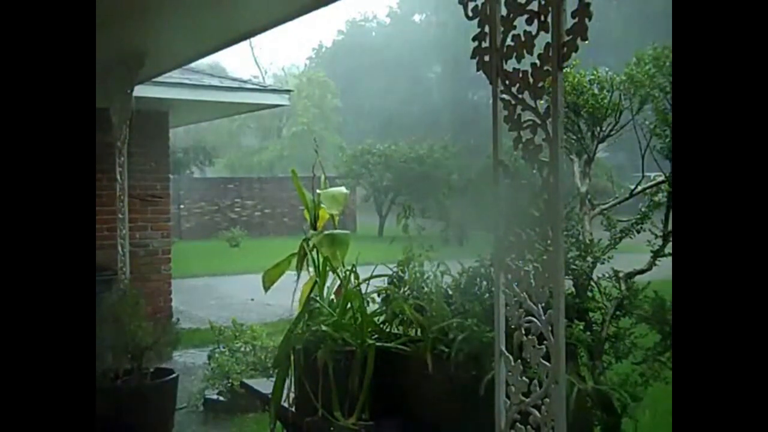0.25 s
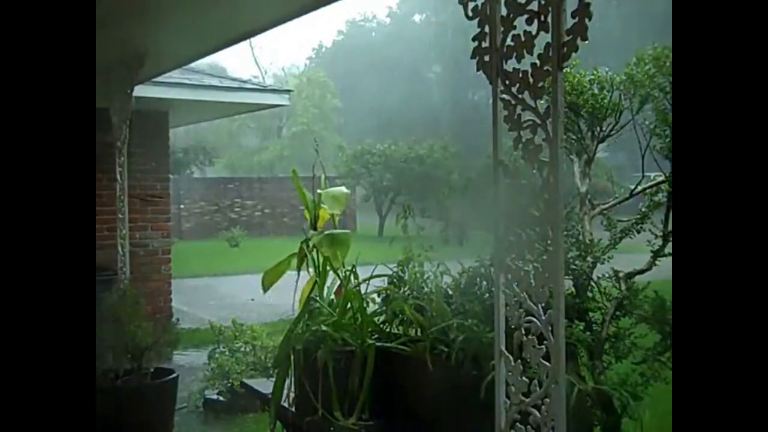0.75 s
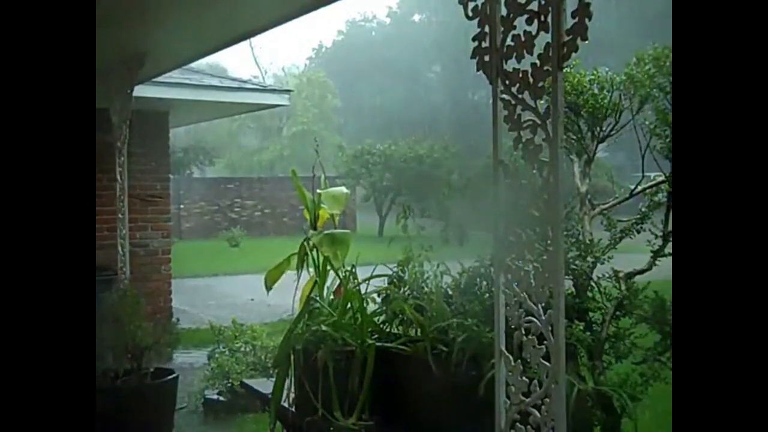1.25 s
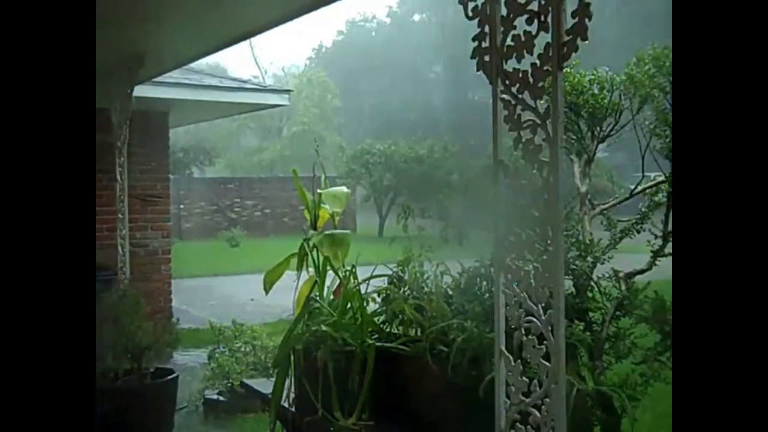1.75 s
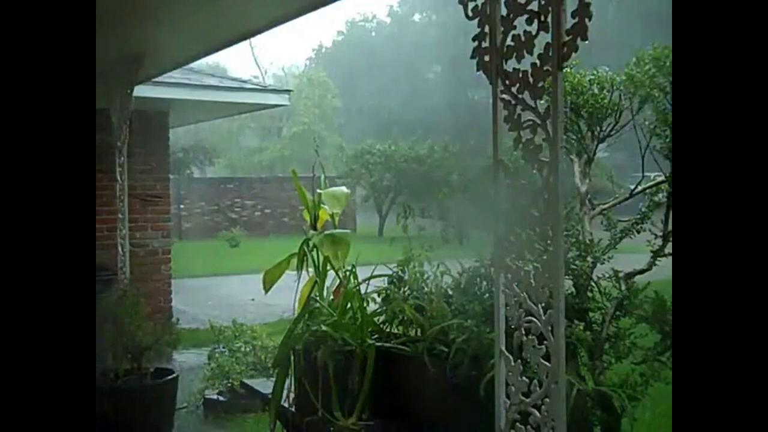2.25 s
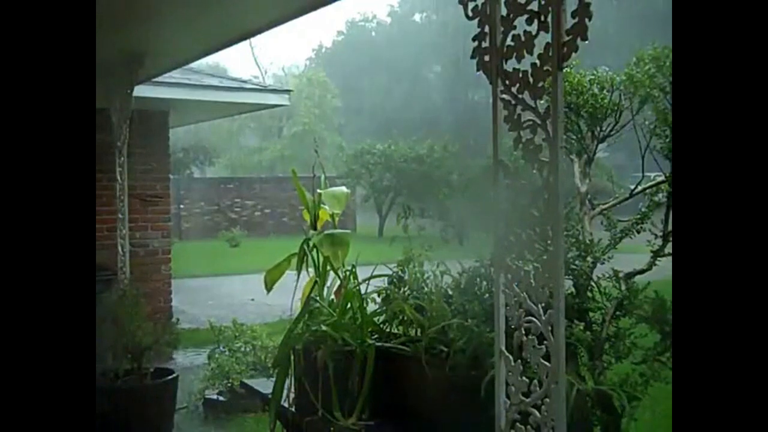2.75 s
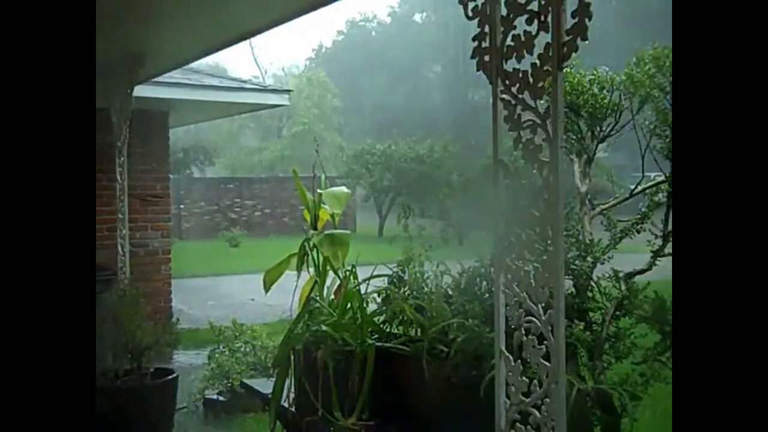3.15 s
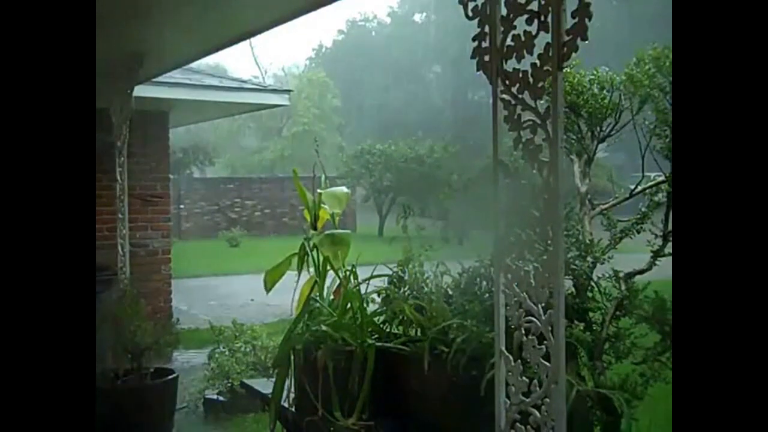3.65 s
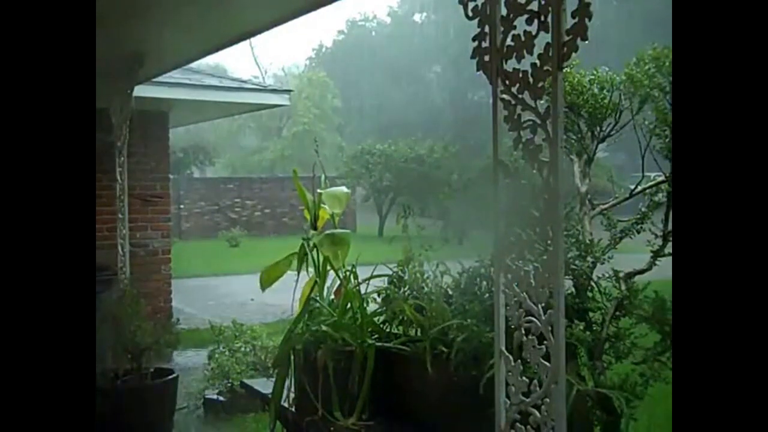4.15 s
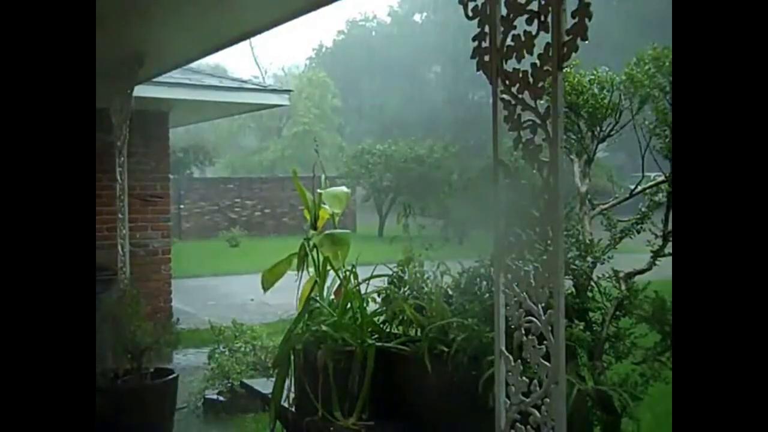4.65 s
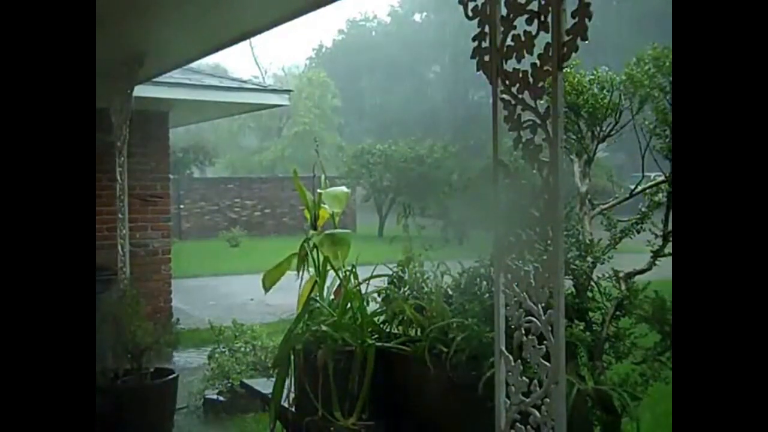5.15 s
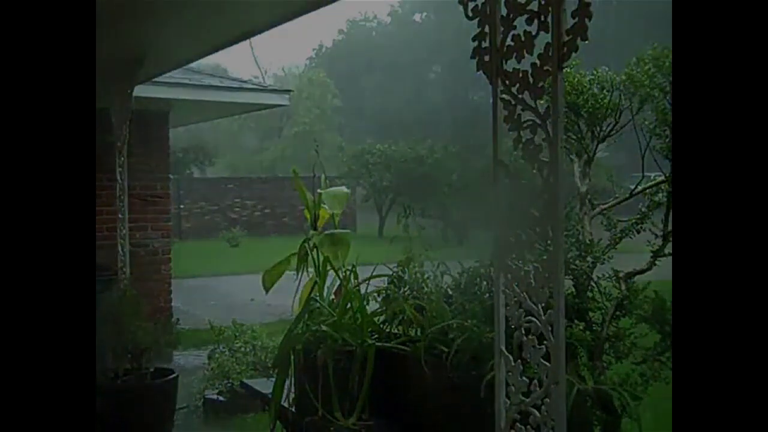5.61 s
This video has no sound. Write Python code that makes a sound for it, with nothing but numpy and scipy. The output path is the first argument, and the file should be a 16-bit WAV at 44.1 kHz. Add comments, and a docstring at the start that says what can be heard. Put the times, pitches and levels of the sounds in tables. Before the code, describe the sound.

Dense hissing downpour with crisp pattering drops and occasional fat splats near a sheltered porch, while faraway low thunder swells and fades.

```python
"""Heavy rain on a garden, heard from under a porch roof: far drops merge into a wash of drifting noise,
nearer ones patter as random clicks, fat drips crack and spray, and leaves, pots and bubbles ring as decaying sines.
Far thunder rolls through twice behind it: dulled pulse trains under swelling envelopes, with short low thuds.
The two microphone ports each ring at their own pitch in the treble, which gives the rain its sizzle."""
import sys
import numpy as np
from scipy import signal
from scipy.io import wavfile
from scipy.ndimage import uniform_filter1d

SR = 44100
rng = np.random.default_rng(int(sys.argv[2]) if len(sys.argv) > 2 else 0)


def wrap_up_sound(samples):
    """Save the sound to the file named by the first command line argument, as 16-bit audio."""
    columns = np.atleast_2d(samples).T
    # keep every value between -1 and 1, then stretch to whole-number steps
    tamed = np.clip(columns, -1, 1)
    steps = np.round(tamed * 32767).astype(np.int16)
    wavfile.write(sys.argv[1], SR, steps)


N = 259299
TIME = np.arange(N) / SR  # seconds


def gain_of(db):
    """Decibels to an amplitude factor: 20 dB is a factor of ten."""
    return 10 ** (np.asarray(db) / 20)


def evened(x):
    """Normalization: scales a signal to rms 1."""
    return x / np.sqrt(np.mean(x ** 2) + 1e-20)


def read(points, hz):
    """Interpolates a table along a logarithmic frequency axis."""
    f, value = np.transpose(points)
    return np.interp(np.log(hz + 1), np.log(f + 1), value)


def add(mix, s, sound):
    """Superposition: adds a stereo sound to the mix in place, from time s."""
    start = max(round(s * SR), 0)
    part = mix[:, start:][:, :sound.shape[1]]
    part += sound[:, :part.shape[1]]


def colour(x, points, size=8192):
    """Minimum-phase filtering: the spectrum alone fixes a causal response, which rings only after a click."""
    hz = abs(np.fft.fftfreq(size, 1 / SR))
    log_gain = np.log(gain_of(read(points, hz)))
    # the Hilbert transform of the log gain supplies the phase
    response = np.exp(np.conj(signal.hilbert(log_gain)))
    taps = np.fft.ifft(response).real[:size // 2]
    return signal.oaconvolve(x, taps[None], axes=1)[:, :N]


def pair(a, b, likeness):
    """Partial coherence: two channels of the given correlation from two unrelated signals."""
    c = np.clip(likeness, -1, 1)
    return np.array([a, c * a + np.sqrt(1 - c ** 2) * b])


def drift(t, slow_hz, fast_hz, count=30):
    """Random modulation of rms 1: sines of random phase, the slower ones larger."""
    total = 0
    for f in np.geomspace(slow_hz, fast_hz, count):
        total = total + np.sin(2 * np.pi * (f * t + rng.random())) / np.sqrt(f)
    return evened(total)


def impacts(per_s, spread_db):
    """Shot noise: clicks at random times and of random sign, most small and a few large."""
    size = gain_of(spread_db * np.minimum(rng.exponential(1, N), 4))
    return size * rng.choice([-1, 1], N) * (rng.random(N) < per_s / SR)


def porch(x, wet_db, t60):
    """Reverberation: floor, wall and roof answer with reflections that fall 60 dB in t60 seconds."""
    t = TIME[:SR // 4]
    tail = rng.standard_normal((2, len(t))) * gain_of(-60 * t / t60)
    tail *= t > .002  # the first reflection takes 2 ms
    tail /= np.linalg.norm(tail, axis=1, keepdims=True)
    return x + gain_of(wet_db) * signal.oaconvolve(x, tail, axes=1)[:, :N]


def peal(start, hold):
    """Power envelope of one peal: exponential swell, hold, quick fall and a lingering echo."""
    rise_s, fall_s = 0.11, .11
    echo_db, echo_fall_s = -5, 0.75  # the land throws each peal back as a long, fading grumble
    early = np.maximum(start - TIME, 0)
    late = np.maximum(TIME - start - hold, 0)
    direct = np.exp(-late / fall_s)
    echo = gain_of(echo_db) * np.exp(-late / echo_fall_s)
    return (np.exp(-early / rise_s) * np.maximum(direct, echo)) ** 2


def paths(db, share, deep_db):
    """Power division: splits a level between dull and bright paths, and adds a deep part."""
    share = np.clip(share, 0, 1)
    return gain_of(db) ** 2 * np.array([[1 - share], [share], [gain_of(deep_db) ** 2]])


def rumble(power, spectrum, likeness):
    """Scattering and absorption: dense pressure pulses, dulled by distance, follow a power envelope."""
    pulses = pair(impacts(900, spread_db=2.0), impacts(900, spread_db=1.5), likeness)
    sound = colour(pulses, spectrum)
    local_power = uniform_filter1d((sound ** 2).mean(0), size=4000)
    return sound * np.sqrt(power / (local_power + 1e-12))


def thunder():
    """Incoherent addition: the powers of overlapping peals sum to a roll with dull, bright and deep parts."""
    # The peals of far thunder. Each row: start of the hold in seconds, hold in seconds, level in dB,
    # share of the power on the open, brighter path (0-1), deep end in dB relative to the level.
    peal_rows = [(1.26, 0.25, -42.5, 0.49, -14.5), (1.8, .38, -46.5, .55, -7),
                 (2.45, .24, -43.5, 0.082, -8), (2.82, .23, -43, .7, -11.5), (5.19, 0.14, -54, 0.39, -8.5)]
    # The low grumble that never quite stops: level in dB, brighter share (0-1), deep end in dB relative to it.
    grumble = (-58.5, 0.3, -6.5)
    # Spectra of the three parts. Each row: frequency in Hz, relative spectral level in dB.
    dull_spectrum = [(60, -25), (100, -3.5), (135, -1.5), (180, 3.5), (225, 0), (290, -15.5), (400, -13.5),
                     (800, -33), (1600, -54)]
    bright_spectrum = [(60, -28.5), (110, -7.5), (175, -1), (260, 1.5), (298, -5), (355, 2.5), (430, -7),
                       (500, -12.5), (800, -19.5), (1600, -41.5)]
    deep_spectrum = [(18, -31), (35, -18.5), (55, -5.5), (70, 2.5), (85, 0), (105, 1), (140, -8.5),
                     (300, -49)]
    power = paths(*grumble)
    for start, hold, *tone in peal_rows:
        power = power + paths(*tone) * peal(start, hold)
    dull, bright, deep = power
    return (rumble(dull, dull_spectrum, likeness=1.0)
            + rumble(bright, bright_spectrum, likeness=0.97)
            + rumble(deep, deep_spectrum, likeness=.85))


def thuds():
    """Wave packets: single shocks stand out of the roll as low sines under Gaussian envelopes."""
    # The dull thuds of the thunder. Each row: time of the peak in seconds, envelope peak in dB, pitch in Hz.
    thud_rows = [(0.095, -41.5, 198), (1.275, -38.5, 177), (1.44, -40.5, 195), (2.454, -41.5, 67),
                 (2.49, -39.5, 138), (2.595, -35, 63), (2.635, -35.5, 145), (2.823, -40, 117.6),
                 (2.955, -43.5, 88), (4.24, -42, 250), (5.021, -42, 273), (5.20, -46, 192)]
    width_s = 0.021  # from the peak to 1/e
    out = np.zeros(N)
    for at, db, hz in thud_rows:
        t = TIME - at
        envelope = gain_of(db) * np.exp(-(t / width_s) ** 2)
        out += envelope * np.sin(2 * np.pi * (hz * t + rng.random()))
    return out


def bubbles(level_db=-56, per_s=150, low_hz=1500, high_hz=7000, cycles=22, spread_db=3):
    """Damped resonance: drops in puddles trap small bubbles, each ringing briefly at its own pitch."""
    out, t = np.zeros((2, N)), TIME[:SR // 16]
    for when, pitch, size, side in rng.random((int(per_s * N / SR), 4)):
        hz = low_hz * (high_hz / low_hz) ** pitch
        loudness = gain_of(-spread_db * np.log(size + .02))  # a few stand out
        ring = loudness * np.exp(-hz * t / cycles) * np.sin(2 * np.pi * hz * t)  # 1/e after so many cycles
        add(out, when * N / SR, np.outer([side, 1 - side], ring))
    return gain_of(level_db) * evened(porch(out, wet_db=1.5, t60=0.17))


def plops(level_db=-6, ring_s=0.00095):
    """Heavily damped resonance: a drip on a broad leaf or pot rings for a few cycles at most."""
    # The drips on leaves and pots. Each row: start in seconds, level in dB before level_db is added, ring in Hz.
    plop_rows = [(0.1171, -30, 1700), (0.5048, -29.5, 1160), (1.6931, -26, 2840), (2.6214, -35.5, 1810),
                 (3.0056, -35, 860), (4.7336, -35, 1770)]
    out, t = np.zeros((2, N)), TIME[:SR // 20]
    for s, db, hz in plop_rows:
        ring = gain_of(db + level_db) * np.sin(2 * np.pi * hz * t) * np.exp(-t / ring_s)
        add(out, s, np.array([ring, ring]))
    return porch(out, wet_db=1.5, t60=.12)


def splats(level_db=3, crack_db=6, spray_db=-11, spray_s=0.0068):
    """Impulse and reflection: a fat drip cracks on the paving, echoes off the wall and sprays fading noise."""
    # The fat drips. Each row: start in seconds, level in dB before level_db and the part's own level are added,
    # left level minus right level in dB.
    splat_rows = [(0.4395, -28.5, -3), (0.795, -28, -2), (0.9749, -24.5, -7), (1.5272, -27, 0),
                  (1.5668, -32.1, -9), (1.5877, -31.5, 7.5), (1.597, -29, -3.5), (2.0792, -32.5, -2),
                  (2.7381, -33, 7.5), (3.1753, -26, -6), (3.38, -30, -5), (3.516, -36, -12),
                  (3.539, -31.5, 5), (4.0357, -29.5, 15), (5.2972, -35.5, 14)]
    # The spectrum of crack and spray. Each row: frequency in Hz, gain in dB.
    crack_spectrum = [(200, -10), (1000, -11), (3500, -6), (5500, 4), (7500, 3.5), (9500, -4.5),
                      (14000, -8)]
    out, t = np.zeros((2, N)), TIME[:SR // 20]
    echo_s, echo_db = .0029, -4
    for s, db, pan_db in splat_rows:
        size = gain_of(db + level_db + np.array([[pan_db], [-pan_db]]) / 2)
        add(out, s, size * gain_of(crack_db))
        add(out, s + echo_s, size * gain_of(crack_db + echo_db))
        spray = np.exp(-t / spray_s) * rng.standard_normal((2, len(t)))
        add(out, s, size * gain_of(spray_db) * spray)
    return porch(colour(out, crack_spectrum), wet_db=-7.5, t60=.08)


def patter(level_db=-44.0, per_s=1500, spread_db=4.0, clump_db=1.5, side_db=3, count=9):
    """Interaural-style cues: clumped near drops reach one port earlier and louder, by their direction."""
    # The tick of a small drop. Each row: frequency in Hz, relative spectral level in dB.
    tick_spectrum = [(100, -31.5), (500, -5), (1200, -7), (3000, 0), (7000, 3.5), (14000, 0)]
    ticks, coarse = np.zeros((2, N)), TIME[::100]
    for lag in np.arange(count) - count // 2:  # one direction per lag, in samples
        clumps = np.interp(TIME, coarse, drift(coarse, 2, 25))
        train = impacts(per_s / count, spread_db) * gain_of(clump_db * clumps)
        lean = gain_of(side_db * lag / count)
        both = np.array([train * lean, np.roll(train, lag) / lean])
        # every direction has its own pattern of reflections
        ticks += porch(both, wet_db=0.5, t60=0.11)
    return gain_of(level_db) * evened(colour(ticks, tick_spectrum))


def wash(patchy_db=1.01, grain_db=2.0, flicker_db=0.5, swell_db=0.27, size=1024):
    """Many drops merge into Gaussian noise, with drifting spectral patches, a quick flicker and a slow swell."""
    # The spectrum of far rain. Each row: frequency in Hz, relative spectral level in dB.
    rain_spectrum = [(25, -24), (45, -21.5), (75, -8), (140, -2), (175, -2), (255, 1), (380, -3), (430, -2),
                     (620, -4.5), (1170, -5.5), (1950, -10), (3000, -7.5), (6000, -8.5), (14000, -12)]
    # The left-right likeness of the rain. Each row: frequency in Hz, correlation (0-1).
    rain_likeness = [(60, 0.75), (200, 0.99), (400, 0.92), (700, 0.87), (1260, 0.76), (2330, 0.45),
                     (4300, 0.18), (8000, .05)]
    level_db = -39.5  # rms level in dB
    hop = size // 4
    t = np.arange(N // hop + 5) * hop / SR
    hz = np.fft.rfftfreq(size, 1 / SR)
    a, b, c, d, broad, narrow = rng.standard_normal((6, len(hz), len(t)))
    # smoothing over frequency, then over time
    broad = uniform_filter1d(uniform_filter1d(broad, size=16, axis=0), size=6, axis=1)
    narrow = uniform_filter1d(uniform_filter1d(narrow, size=3, axis=0), size=9, axis=1)
    broad, narrow = evened(broad), evened(narrow)
    narrow *= np.clip(hz / 1500, 0, 1)[:, None]  # the low murmur stays smooth
    z = pair(a + 1j * b, c + 1j * d, read(rain_likeness, hz)[:, None])
    z *= gain_of(read(rain_spectrum, hz)[:, None] + patchy_db * broad + grain_db * narrow)
    z *= gain_of(flicker_db * drift(t, 4, 30) + swell_db * drift(t, 0.79, 3))
    noise = signal.istft(z, nperseg=size, noverlap=size - hop)[1][:, :N]
    return gain_of(level_db) * evened(noise)


def scene():
    """Linear superposition: rain far and near, with the thunder behind it."""
    return thunder() + thuds() + bubbles() + plops() + splats() + patter() + wash()


def record(dry):
    """Port resonance and band limiting: each port colours its channel, and the sound stops short."""
    # The colour of the microphone ports. Each row: frequency in Hz, left gain in dB, right gain in dB.
    port_rows = np.array([(60, -3, 0), (500, 1.03, 1.57), (2990, 1, 2), (4350, 0.6, 2), (5640, 2.5, 4.5),
                          (6500, 3.5, 8.5), (7000, 5, 6.5), (8000, 11, -1), (8710, 5.5, -2), (9600, 1, -13),
                          (10500, -3, -8), (12000, -5.5, -18.5), (14100, -7.5, -24)])
    stop_s = 5.405  # seconds
    edge_hz = 14270  # low-pass edge in Hz
    left = colour(dry[:1], port_rows[:, [0, 1]])
    right = colour(dry[1:], port_rows[:, [0, 2]])
    # the brighter port answers sooner: one sample keeps them in step
    heard = np.vstack([np.roll(left, 1), right])
    heard = heard * gain_of(np.interp(TIME - stop_s, [0, .001, .04], [0, -18, -100]))
    low_pass = signal.firwin(1023, edge_hz, window=("kaiser", 9), fs=SR)
    return signal.oaconvolve(heard, low_pass[None], "same")


dry = scene()
out = record(dry)
wrap_up_sound(out)
```